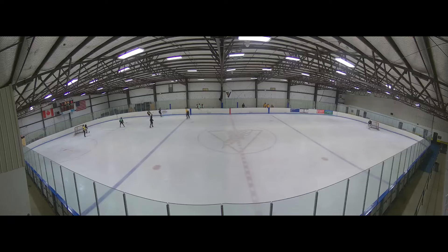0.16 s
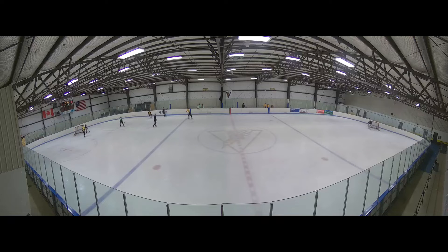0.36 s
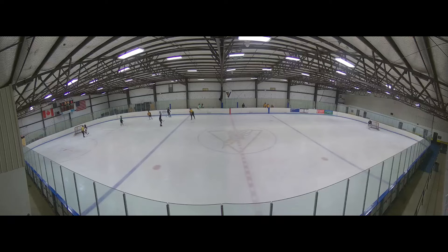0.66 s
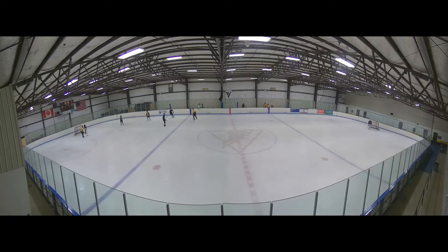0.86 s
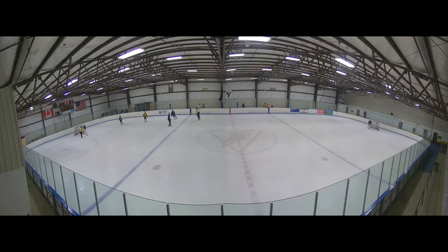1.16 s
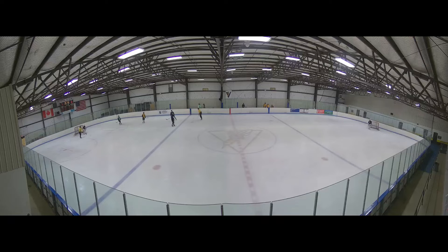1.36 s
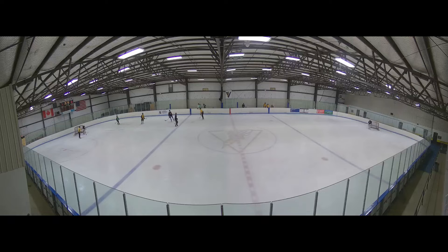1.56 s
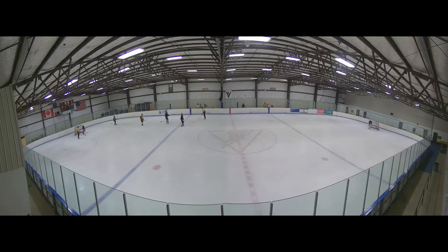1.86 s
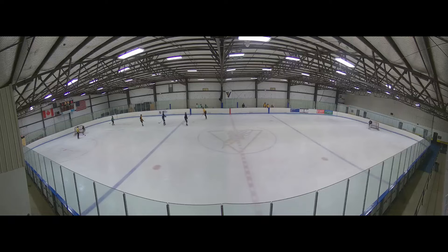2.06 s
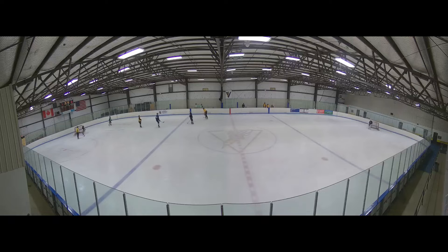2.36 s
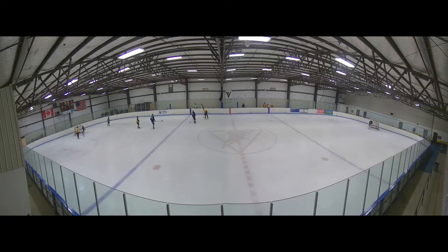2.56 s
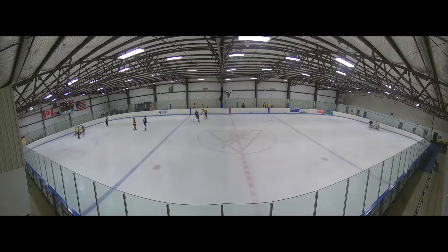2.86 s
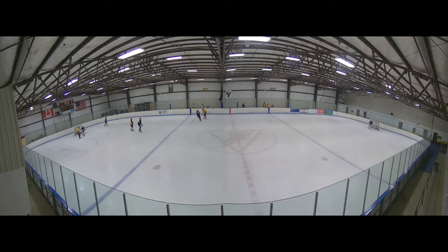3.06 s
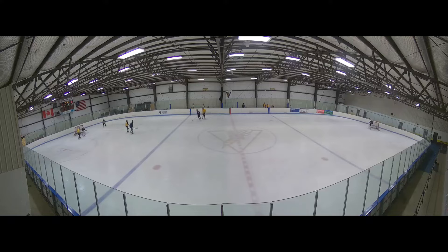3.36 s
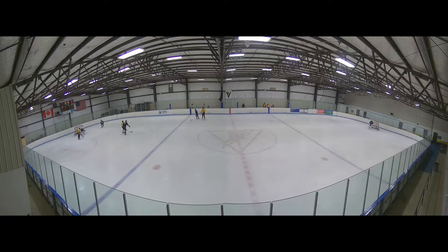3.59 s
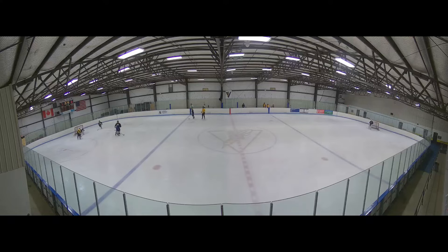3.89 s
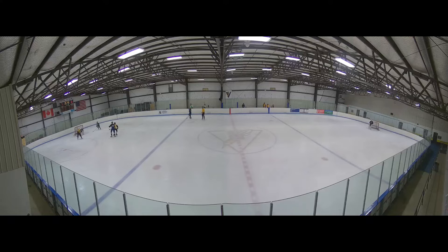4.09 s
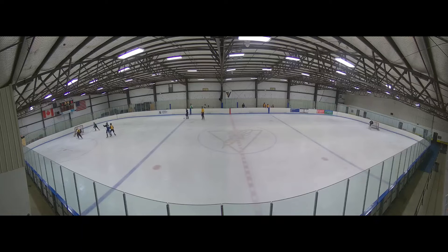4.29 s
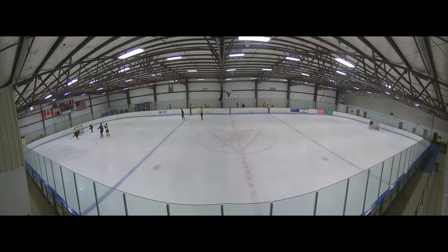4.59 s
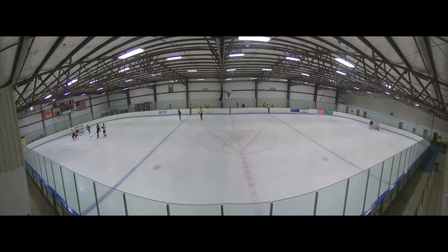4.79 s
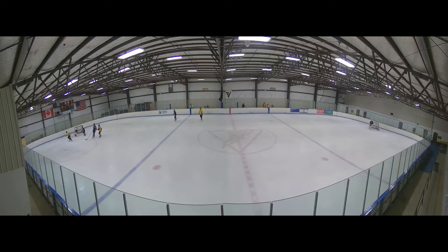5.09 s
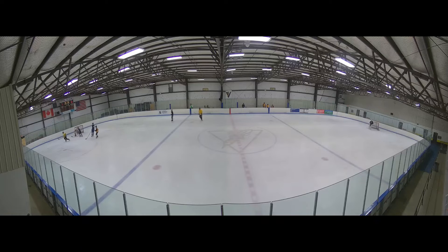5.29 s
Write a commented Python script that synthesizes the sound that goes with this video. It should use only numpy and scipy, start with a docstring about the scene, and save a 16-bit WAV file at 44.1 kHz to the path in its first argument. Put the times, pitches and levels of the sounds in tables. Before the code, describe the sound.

In a large indoor ice rink, distant hockey sticks clack against puck and ice in a quick flurry while skates scrape. About halfway, the puck slams into the boards, which boom and rattle the glass. After a quieter stretch of skating and light taps, a hard shot cracks at the very end. The microphone sits above the glass, catching long echoes and a steady ventilation rumble.

```python
"""Hockey practice in an indoor rink

The microphone is above the glass in a steel-roofed hall, with the players at the far end.
Sticks crack on puck and ice, a shot slams into the boards and sets them booming and the glass
chattering, and skates carve and scrape, shaving off chips of ice. Everything rings on in the
big hall, over the steady rush of the air plant."""
import sys
import numpy as np
from scipy import signal
from scipy.fft import rfft, irfft, next_fast_len
from scipy.io import wavfile

SR = 44100
rng = np.random.default_rng(int(sys.argv[2]) if len(sys.argv) > 2 else 0)


def to_wav(sig):
    """Store sig (one row per channel, or 1-D mono) as 16-bit WAV at the path in sys.argv[1].

    Samples outside -1..1 are clipped; the rate is SR.
    """
    pcm = np.clip(np.atleast_2d(sig), -1, 1) * 32767
    pcm = np.round(pcm).astype(np.int16)
    wavfile.write(sys.argv[1], SR, pcm.T)  # frames by channels


N = 239897
TIME = np.arange(N) / SR

# Blows at the far end: (time [s], level [dB], pitch [Hz], length [cycles], hall over direct [dB])
STICK_HITS = [(0.0218, -18.5, 1330, 3.8, -14.5), (0.363, -21.5, 2200, 8.9, -6),
              (0.4718, -30, 930, 2.5, 5.5), (0.7909, -17, 1510, 11, 4.5), (0.8115, -15.5, 2290, 25, 0),
              (0.8231, -19, 2700, 5.2, -4), (0.849, -25.5, 1530, 32, -6.5), (0.9013, -17.5, 1970, 6.9, 4.5),
              (0.931, -28, 1580, 7.5, 6.5), (0.952, -28, 1520, 17, 3.5), (1.002, -20, 1590, 11, -10),
              (1.145, -24, 1320, 6.2, 3), (1.3298, -20, 1300, 3, 0.5), (1.3798, -16, 2350, 7.3, -9.5),
              (1.39, -15.5, 2700, 17, -7), (1.405, -14, 2580, 8.4, -8), (1.8830, -19, 1930, 9.2, -1),
              (1.9314, -23, 1430, 6.8, -11), (2.0482, -23, 1300, 36, -18), (2.0616, -21, 1932, 14, -9),
              (2.115, -18, 1420, 4, -11), (2.130, -24, 1680, 6.4, -3.5), (2.389, -25.5, 1910, 33, -11),
              (2.584, -25.5, 1353, 7.3, -1.5), (2.771, -28.5, 1330, 7.8, -9),
              (4.408, -33.5, 1050, 6.6, 3.5), (4.5316, -31, 1500, 11, 1.5), (4.632, -34, 1280, 11, -4),
              (4.874, -25, 1720, 4.3, 5), (4.961, -27, 1390, 22, -19), (5.134, -25.5, 1410, 14, 2)]  # blades on puck and ice
HARD_SHOTS = [(5.2686, -4.5, 2050, 7.7, -14.5)]  # in front of the net
BOARD_HITS = [(0.49, -29.5, 600, 7, -7.5), (0.792, -34, 683, 5, 3.5), (0.8120, -23.5, 766, 20, -1.5),
              (0.824, -32.5, 654, 16, 3), (0.8925, -21.5, 677, 26, -2), (0.904, -28.5, 640, 9, -3),
              (1.022, -34.5, 212, 16, -1.5), (2.128, -25.5, 466, 2.4, 3), (2.335, -28, 402, 1.05, 8.5),
              (2.798, -6.5, 1050, 1.8, 5.5), (2.7991, -13.5, 960, 9.6, -3.5), (2.8062, -10, 1670, 6.1, -1),
              (2.824, -25.5, 490, 14, -5.5), (2.846, -14.5, 1086, 3.9, -14), (2.8685, -19, 520, 10, -5.5),
              (2.881, -12, 950, 3.5, -12.5), (2.903, -22.5, 1500, 3.5, 1.5), (2.994, -23.5, 2330, 6.5, 3.5),
              (3.037, -22, 1110, 12, -1), (3.046, -21.5, 658, 8, 0), (3.068, -28, 866.7, 11, -20)]  # puck and players against the boards

# What rings after a blow: (frequency [Hz], level relative to the blow [dB], t60 [s])
STICK_RING = [(720, -28.5, 0.048), (1263, -18, 0.082), (1530, -23.5, 0.03), (1864, -18.5, 0.039),
              (2290, -19, 0.033), (2896, -17.5, 0.053), (3360, -19.5, 0.047), (4560, -22.5, 0.014)]
SHOT_RING = [(377, -32, 0.24), (710, -45, 0.05), (909.5, -25.5, 0.28), (1303, -22, 0.08), (1680, -26, 0.05),
             (2260, -17, 0.061), (3040, -14.5, 0.041), (3450, -15, 0.025), (4100, -30, 0.14),
             (6080, -28, 0.069)]
PANEL_RING = [(129, -34, 0.052), (168, -30, 0.16), (240, -50.5, 0.057), (380, -38, 0.054),
              (530, -33.5, 0.034), (788, -24, 0.031), (1110, -22.5, 0.023)]
WALL_RING = [(122.4, -27.5, 0.96), (132.7, -37, 0.59), (173.3, -30.5, 0.8), (385, -28, 0.47),
             (529, -25.5, 0.45)]  # the whole run of boards

# Strokes on the ice: (start [s], rise [s], release after start [s], level [dB], treble bite [dB])
SKATE_STROKES = [(0.31, 0.13, 0.051, -32.5, 13), (0.82, 0.036, 0.099, -34, 9),
                 (1.55, 0.053, 0.42, -42.5, 1.5), (2.01, 0.043, 0.12, -35.5, 10),
                 (2.25, 0.042, 0.4, -44.5, 5.5), (4.54, 0.082, 0.21, -42, 3.5),
                 (4.71, 0.11, 0.17, -36.5, 7), (4.919, 0.043, 0.042, -38, -6)]
STICK_SWEEPS = [(1.328, 0.0017, 0.0028, -27.5, 9.5), (1.348, 0.011, 0.062, -27.5, -2.5),
                (1.455, 0.021, 0.05, -31, -8.5), (5.261, 0.0093, 0.059, -31.5, 1)]
# The hall still ringing at the start, then an even wash of far skates: (time [s], level [dB])
FAR_WASH_LEVELS = [(0, -39.5), (0.7, -48.5), (2.4, -54.5), (3.6, -47), (4.3, -48), (5.44, -50)]

# Noise spectra: (frequency [Hz], relative spectral density [dB])
SKATE_SPECTRUM = [(150, -0.5), (400, -8), (800, 0.5), (1350, 3.5), (2200, -1.5), (3200, -8), (4500, -14),
                  (7000, -28.5)]
SWEEP_SPECTRUM = [(150, -3.5), (500, -0.5), (1000, 2), (1500, 5.5), (2500, 4), (3100, 3), (3900, -3),
                  (4800, -6.5), (6000, -6), (7000, -18.5)]
GLASS_SPECTRUM = [(100, -3), (300, -11), (800, -9.5), (1500, 4.5), (3000, 6.5), (4500, 3.5), (7000, -11)]
AIR_PLANT_SPECTRUM = [(20, 14), (32, 3), (48, -3), (60, 4), (90, -9), (120, 0.5), (145, -9.5), (200, -3.5),
                      (330, -12), (600, -11.5), (1300, -29), (2500, -50), (4500, -28), (7000, -37)]

# The hall's ring: (frequency [Hz], t60 [s])
HALL_DECAY = [(100, 7), (300, 3.65), (700, 2.84), (1800, 2.83), (3500, 2.48), (7000, 1.14)]
# Bunches of echoes from ice, glass, roof and end wall: (delay [s], relative level [dB], t60 [s])
ECHO_BUNCHES = [(0.002, 7, .06), (0.014, -3, .9), (0.07, -4, .55), (0.235, -9, .8)]


def sticks(splinter_db=-17, splinter_t60=0.03, soft_hz=3300, hard_hz=7000):
    """Hard blades give short bright cracks and a spit of splintered ice; lighter taps are duller."""
    sounds, loudest_db = [], max(row[1] for row in STICK_HITS)
    for _, db, hz, cycles, _ in STICK_HITS:
        crack = blow(hz, STICK_RING, cycles, low_hz=467)
        splinters = coloured(rng.standard_normal(len(crack)), SWEEP_SPECTRUM)
        splinters *= from_db(splinter_db) * decay(TIME[:len(crack)], splinter_t60)
        hardness = from_db(db - loudest_db)
        cutoff_hz = soft_hz * (hard_hz / soft_hz) ** hardness
        sounds.append(cut(crack + splinters, cutoff_hz, "low"))
    return across_rink(STICK_HITS, sounds, hall, spots=4)


def hard_shot(clatter_db=-5.5, clatter_t60=0.39, echoes_per_s=3000, first_echo_s=0.006):
    """The loaded stick cracks and rings; the boards and glass near it throw back a dense clatter."""
    t, sounds = TIME[:N // 12], []
    for _, _, hz, cycles, _ in HARD_SHOTS:
        echoes = (rng.random(len(t)) < echoes_per_s / SR) * rng.choice([-1, 1], len(t))
        echoes = echoes * (t > first_echo_s) * decay(t, clatter_t60)
        paths = (t == 0) + from_db(clatter_db) * echoes / np.linalg.norm(echoes)
        crack = blow(hz, SHOT_RING, cycles, low_hz=550, mistuning=0)
        sounds.append(signal.fftconvolve(crack, paths))
    return across_rink(HARD_SHOTS, sounds, hall, spots=1)


def boards(rattle_db=-19, rattle_t60=0.15, panel_low_hz=87.6):
    """Panels knock under a blow; the harder it is, the more the glass chatters all along the wall."""
    t, loudest_db = TIME[:N // 16], max(row[1] for row in BOARD_HITS)
    knocks, rattles = [], []
    for _, db, hz, cycles, _ in BOARD_HITS:
        knocks.append(blow(hz, PANEL_RING, cycles, low_hz=129))
        chatter = coloured(rng.laplace(size=len(t)), GLASS_SPECTRUM) * decay(t, rattle_t60)
        rattles.append(from_db(rattle_db + db - loudest_db) * chatter)
    panels = across_rink(BOARD_HITS, knocks, hall, spots=5)
    glass = across_rink(BOARD_HITS, rattles, hall_wash, spots=1)
    return cut(panels + glass, panel_low_hz, "high", order=4)  # the boards radiate little deep bass


def wall_boom(build_s=0.01, hall_db=-9):
    """The hardest blow spreads along the boards and makes the whole wall boom."""
    start, db = max(BOARD_HITS, key=lambda row: row[1])[:2]
    t = np.maximum(TIME - start, 0)
    modes = sum(from_db(db + mode_db) * damped_sine(t, hz, t60) for hz, mode_db, t60 in WALL_RING)
    boom = modes * np.minimum(t / build_s, 1)
    return boom + from_db(hall_db) * hall(boom)


def blow(hz, modes, cycles, low_hz, mistuning=0.025, scatter_db=2, contact_hz=5660):
    """One contact: a short crack, then the body's modes, different for each point struck."""
    t = TIME[:N // 24]
    crack, ring = damped_sine(t, hz, cycles / hz), 0
    for mode_hz, db, t60 in modes:
        strength, detune, side = rng.standard_normal(3)
        mode = np.sign(side) * damped_sine(t, mode_hz * (1 + mistuning * detune), t60)
        ring += from_db(db + scatter_db * strength) * mode
    crack, ring = cut([crack, ring], low_hz, "high", order=1)
    crack, ring = cut([crack, ring], contact_hz, "low", order=3)  # rubber gives, rounding the crack
    return crack / np.max(np.abs(crack)) + ring


def skates():
    """Skaters push off and carve, shaving coarse chips."""
    hiss = shavings(SKATE_SPECTRUM, chips_per_s=4000, chatter_db=5.5)
    return scrape(hiss, SKATE_STROKES, release_t60=0.14, direct_db=-8, hall_db=-1.5)


def stick_sweeps():
    """Stick blades brush the ice with a finer, brighter hiss."""
    hiss = shavings(SWEEP_SPECTRUM, chips_per_s=7000, chatter_db=1)
    return scrape(hiss, STICK_SWEEPS, release_t60=0.041, direct_db=-3, hall_db=1)


def scrape(hiss, strokes, release_t60, direct_db, hall_db, bite_hz=3400):
    """Each stroke presses in and lets go; the hiss follows the force and brightens as the edge bites."""
    force, bite = 0, 0
    for start, rise, length, db, bite_db in strokes:
        press = from_db(db) * np.clip((TIME - start) / rise, 0, 1)
        press *= decay(TIME - start - length, release_t60)
        force += press
        bite += from_db(bite_db) * press
    treble = signal.sosfiltfilt(signal.butter(2, bite_hz, "high", fs=SR, output="sos"), hiss)
    at_blade = force * (hiss - treble) + bite * treble
    return from_db(direct_db) * at_blade + from_db(hall_db) * hall(at_blade)


def shavings(spectrum, chips_per_s, chatter_db):
    """An edge breaks off ice chips of uneven size, in spurts as it grips and slips; rms 1."""
    chips = (rng.random(N) < chips_per_s / SR) * rng.laplace(size=N)
    grip = from_db(chatter_db * drift(rate_hz=70))
    return coloured(chips * grip, spectrum)


def far_wash():
    """A soft hiss: the hall still ringing at the start, then an even wash of far skates."""
    level_db = np.interp(TIME, *np.transpose(FAR_WASH_LEVELS))
    return from_db(level_db) * shavings(SKATE_SPECTRUM, chips_per_s=14000, chatter_db=1.5)


def air_plant(level_db=-43.5, lowest_hz=17.2):
    """Room tone: ducts and fans rumble, drone and hiss steadily."""
    rush = cut(rng.standard_normal(N), lowest_hz, "high")
    return from_db(level_db) * coloured(rush, AIR_PLANT_SPECTRUM)


def across_rink(hits, sounds, room, spots):
    """Blows reach the microphone directly and through the hall, which answers each spot differently."""
    direct, sends = np.zeros(N), np.zeros((spots, N))
    for k, ((start, db, _, _, hall_db), sound) in enumerate(zip(hits, sounds)):
        add(direct, start, from_db(db) * sound)
        add(sends[k % spots], start, from_db(db + hall_db) * sound)
    return direct + sum(room(send) for send in sends)


def hall(x):
    """The hall's answer to a sound from one spot on the ice."""
    return signal.fftconvolve(x, hall_response())[:N]


def hall_wash(x, frame=256):
    """The hall's answer to a widespread sound: its power rings on as a smooth wash."""
    source, ring, noise = (signal.stft(part, nperseg=frame)[2]
                           for part in (x, hall_response(), rng.standard_normal(N)))
    power = signal.fftconvolve(np.abs(source) ** 2, np.abs(ring) ** 2, axes=1)[:, :noise.shape[1]]
    window_gain = np.sqrt(frame / 2) * frame / 1.5
    return window_gain * signal.istft(noise * np.sqrt(np.abs(power)))[1][:N]


def hall_response(build_s=0.004, spikiness=0.35, merge_s=1.0):
    """Bunched early echoes, then a dense tail whose treble dies first; energy 1."""
    t = TIME[:N // 3]
    middle_t60 = at_hz(HALL_DECAY, 1000)
    hz, times, bands = signal.stft(rng.standard_normal(len(t)), SR, nperseg=512)
    # each pitch dies faster or slower than the middle of the range
    extra_db_per_s = -60 * (1 / at_hz(HALL_DECAY, hz) - 1 / middle_t60)
    tail = signal.istft(bands * from_db(np.outer(extra_db_per_s, times)))[1][:len(t)]
    # early echoes come as separate spikes, later ones merge
    spread = spikiness * decay(t, merge_s)
    spikes = np.exp(spread * (np.clip(rng.standard_normal(len(t)), -2, 2) - spread))
    power = (1 - np.exp(-t / build_s)) * decay(t, middle_t60) ** 2
    for delay, db, t60 in ECHO_BUNCHES:
        power += (from_db(db) * (t > delay) * decay(t - delay, t60)) ** 2
    response = tail * spikes * np.sqrt(power)
    return response / np.linalg.norm(response)


def from_db(db):
    """Decibels to gain."""
    return 10 ** (np.asarray(db) / 20)


def unit_rms(x):
    """Scale to rms 1."""
    return x / np.sqrt(np.mean(x ** 2) + 1e-20)


def at_hz(points, hz):
    """Read a table on a log-frequency axis."""
    frequencies, values = np.transpose(points)
    return np.interp(np.log(np.maximum(hz, 1)), np.log(frequencies), values)


def cut(x, hz, kind, order=2):
    """Butterworth filter."""
    return signal.sosfilt(signal.butter(order, hz, kind, fs=SR, output="sos"), x)


def coloured(x, spectrum):
    """Give a steady signal a spectrum; rms 1."""
    size = next_fast_len(len(x))
    gain = from_db(at_hz(spectrum, np.fft.rfftfreq(size, 1 / SR)))
    return unit_rms(irfft(rfft(x, size) * gain, size)[:len(x)])


def drift(rate_hz):
    """A random wander; rms 1."""
    knots = rng.standard_normal(4000)
    return unit_rms(np.interp(TIME * rate_hz, np.arange(len(knots)), knots))


def decay(t, t60):
    """Hold at 1 until t = 0, then fall by 60 dB every t60 seconds."""
    return np.exp(-np.clip(np.log(1000) * t / t60, 0, 20))


def damped_sine(t, hz, t60):
    """One vibration dying away."""
    return np.sin(2 * np.pi * hz * t) * decay(t, t60)


def add(track, start_s, sound):
    """Mix a sound in at a time."""
    i = int(np.clip(start_s * SR, 0, N - 1))
    track[i:i + len(sound)] += sound[:N - i]


def scene():
    """Players, boards and building, heard in mono from above the glass."""
    blows = sticks() + hard_shot() + boards() + wall_boom()
    return (blows + skates() + stick_sweeps() + far_wash() + air_plant())[None]


def record(dry, cutoff_hz=7000):
    """The small microphone passes nothing above the middle treble."""
    return signal.sosfilt(signal.ellip(10, 0.2, 80, cutoff_hz, fs=SR, output="sos"), dry)


dry = scene()
out = record(dry)
to_wav(out)
```